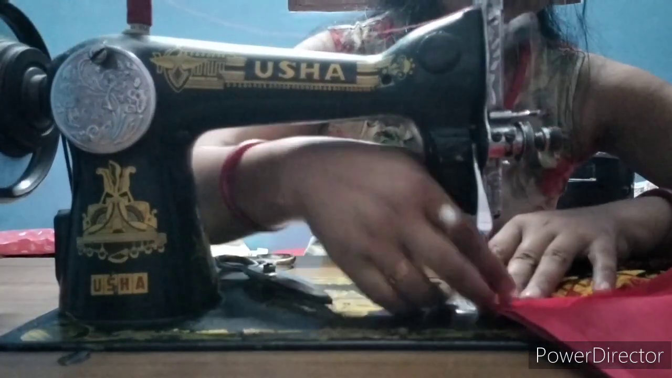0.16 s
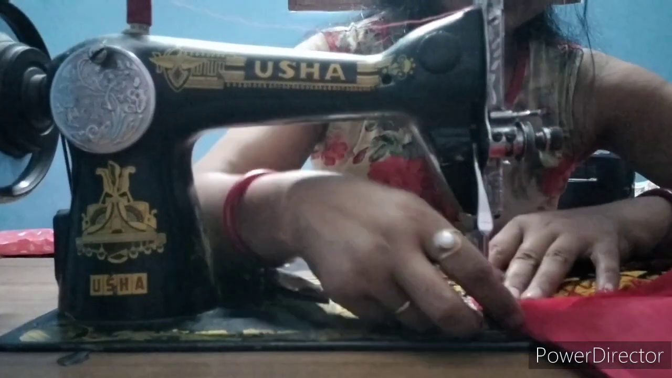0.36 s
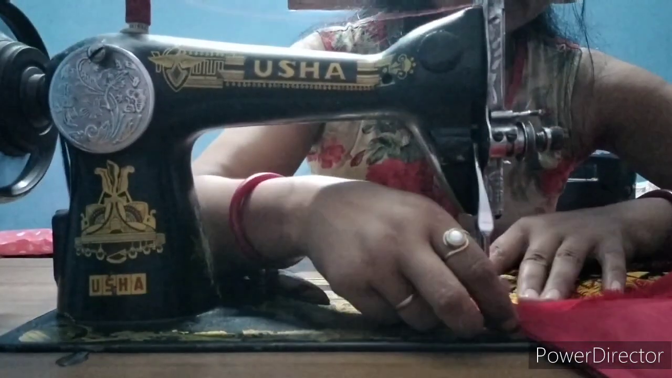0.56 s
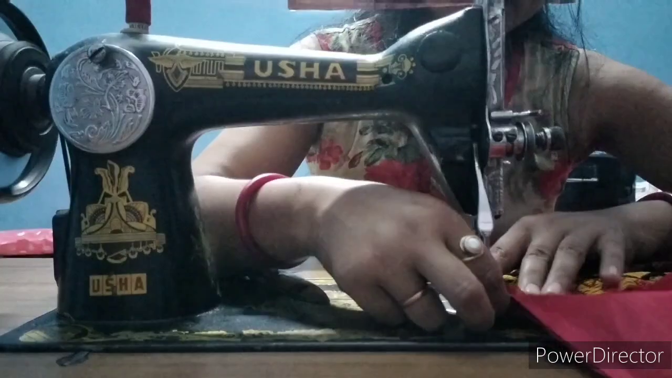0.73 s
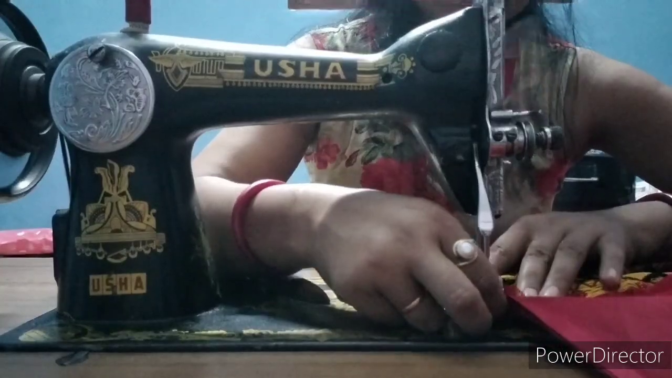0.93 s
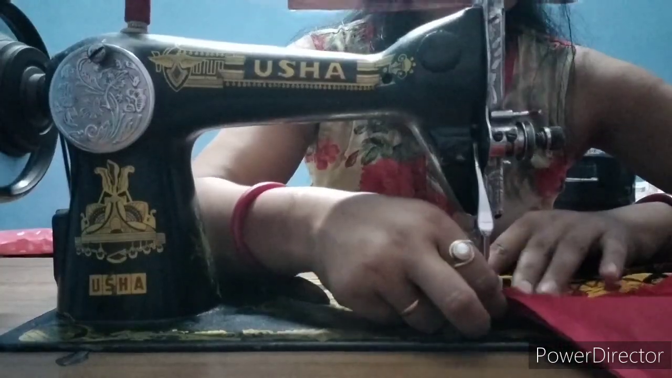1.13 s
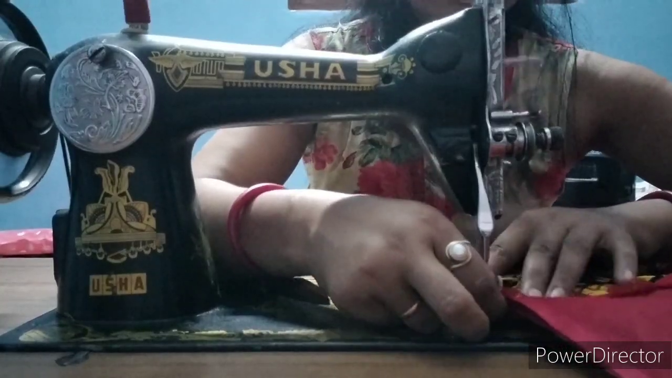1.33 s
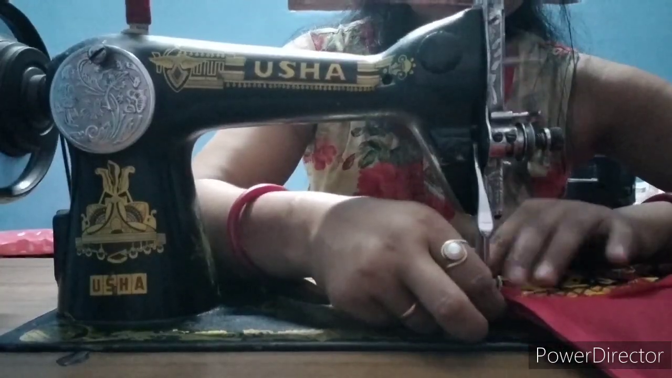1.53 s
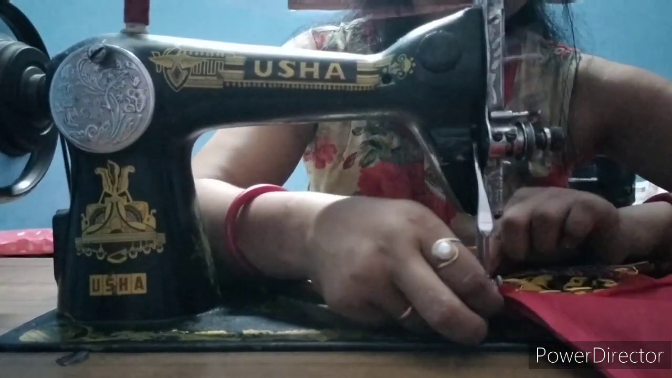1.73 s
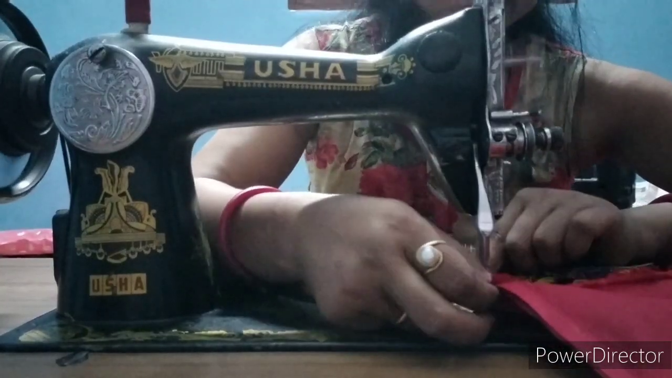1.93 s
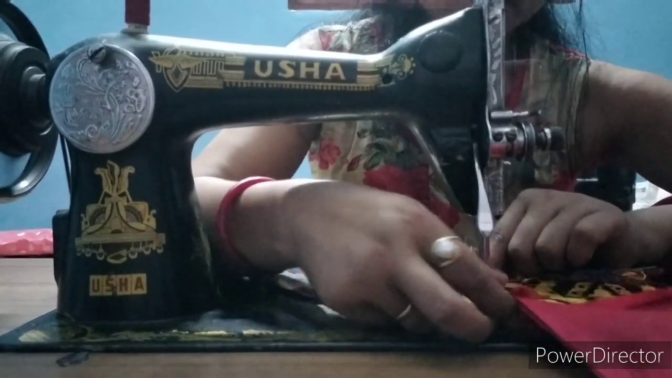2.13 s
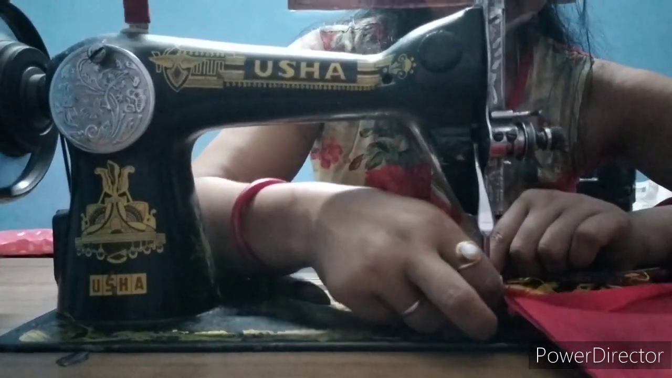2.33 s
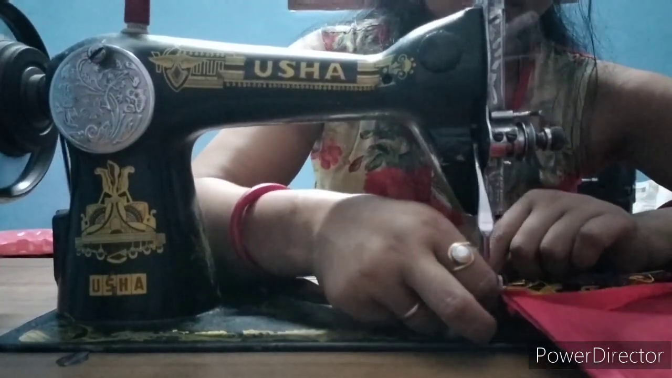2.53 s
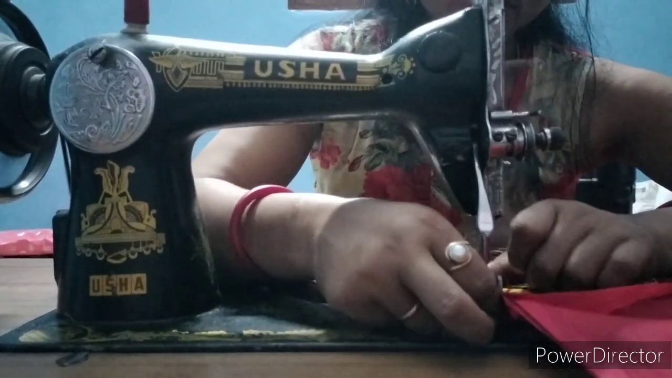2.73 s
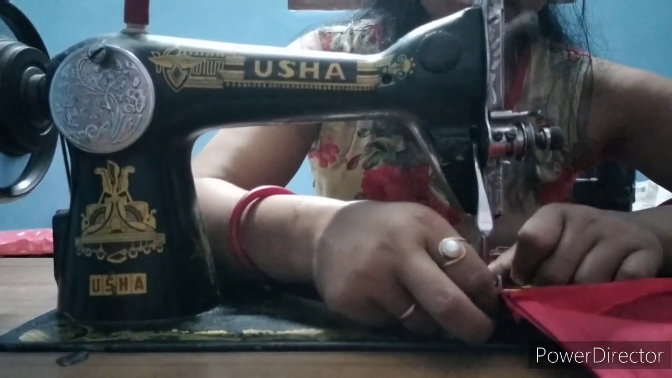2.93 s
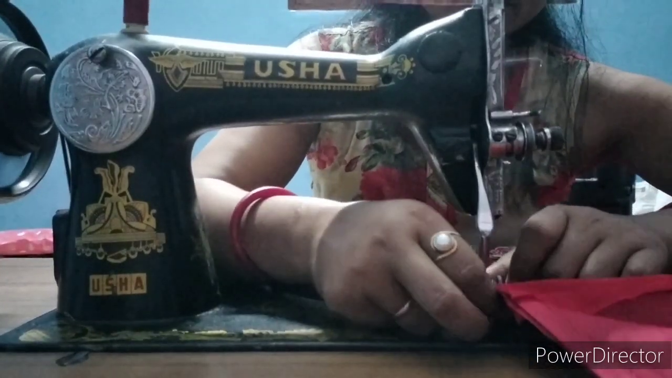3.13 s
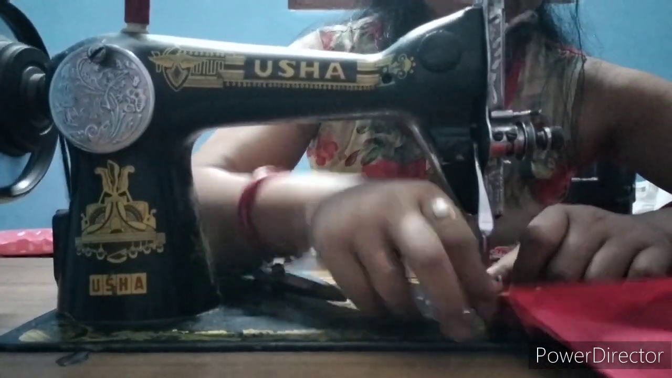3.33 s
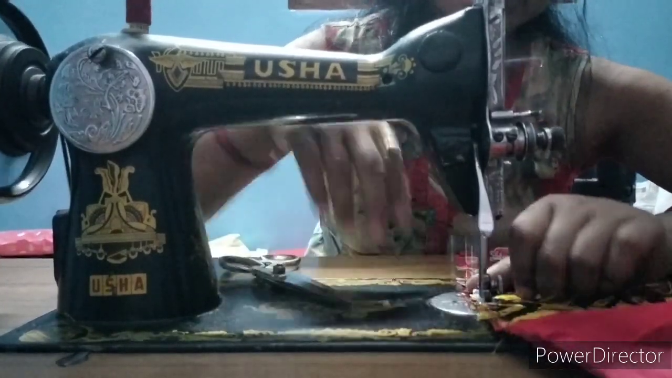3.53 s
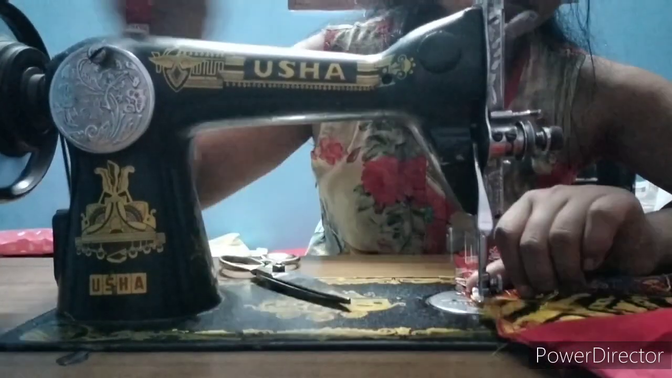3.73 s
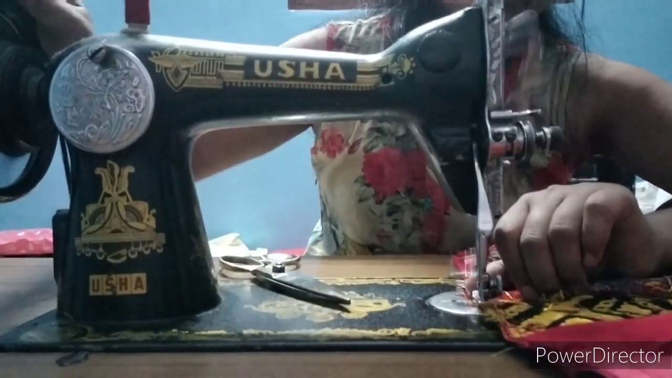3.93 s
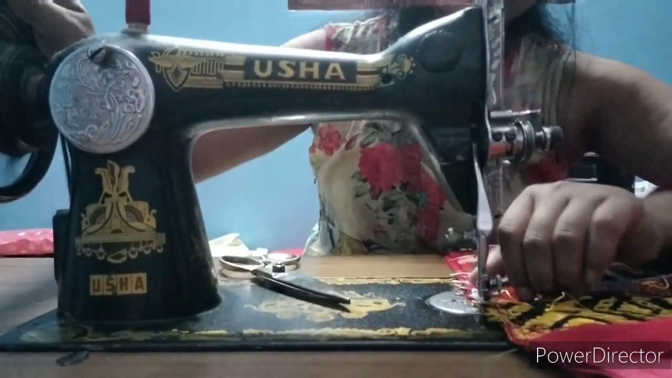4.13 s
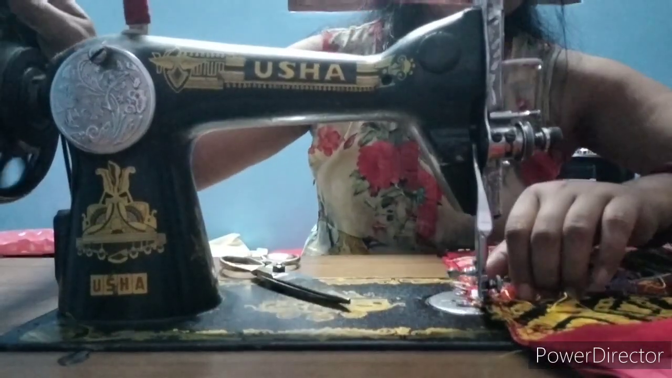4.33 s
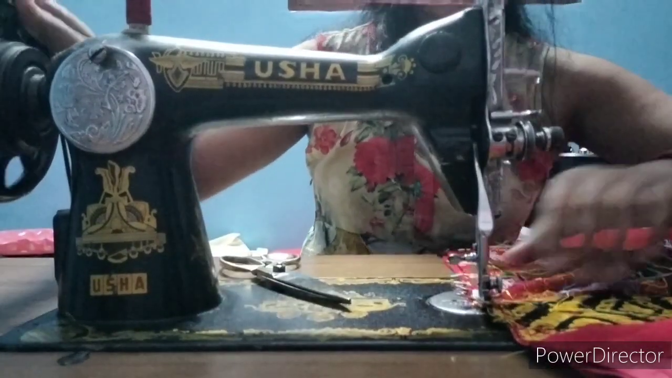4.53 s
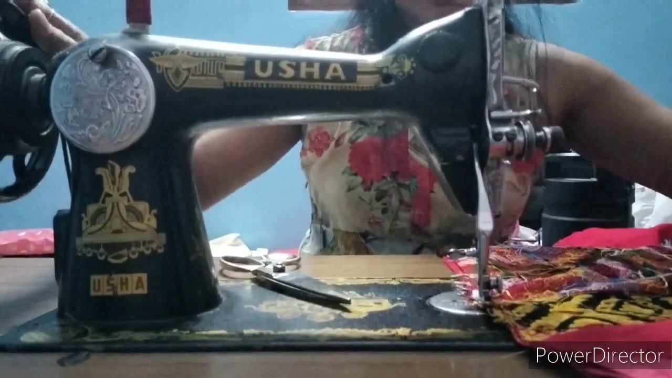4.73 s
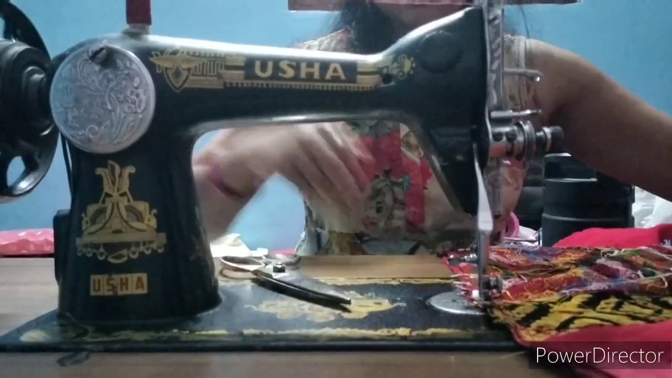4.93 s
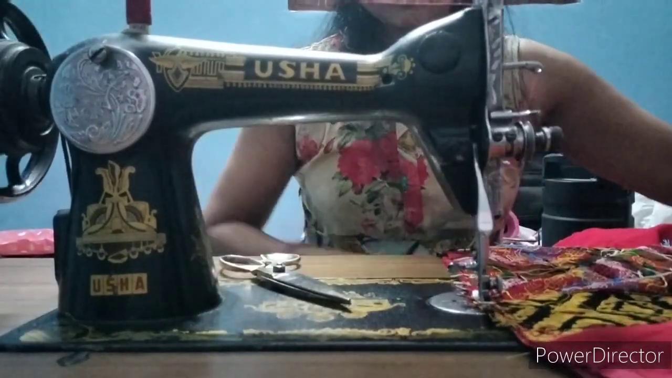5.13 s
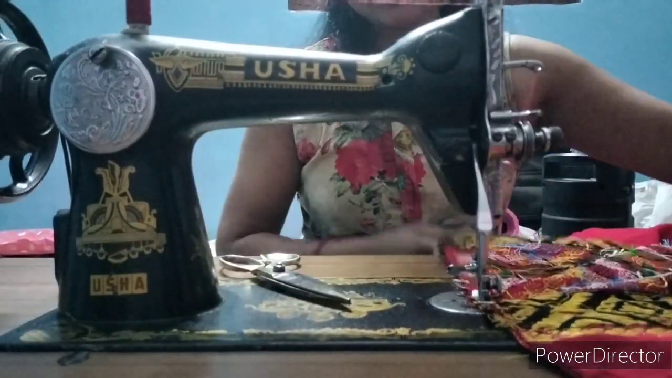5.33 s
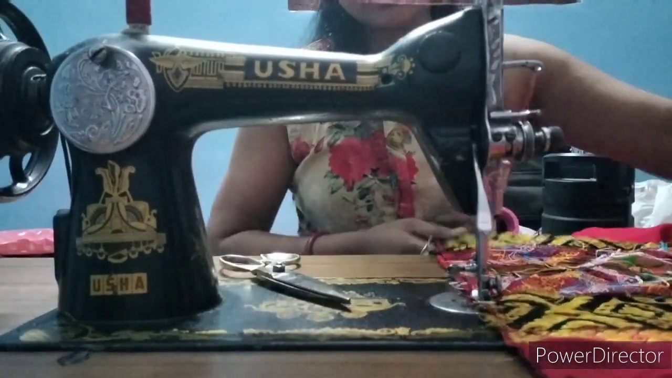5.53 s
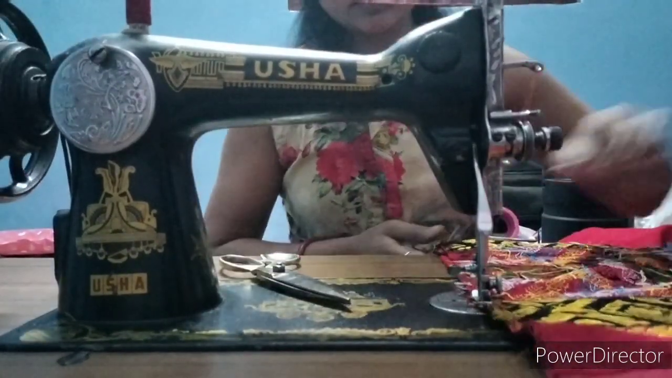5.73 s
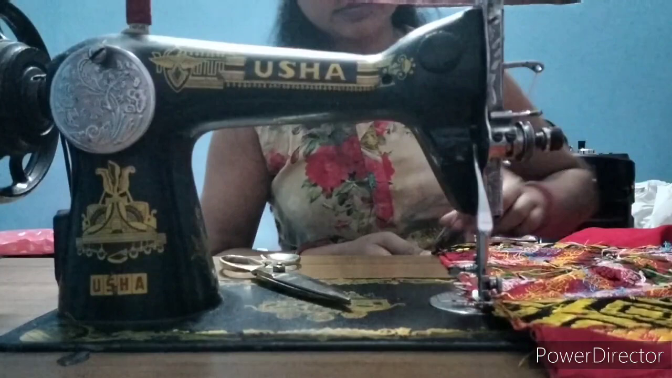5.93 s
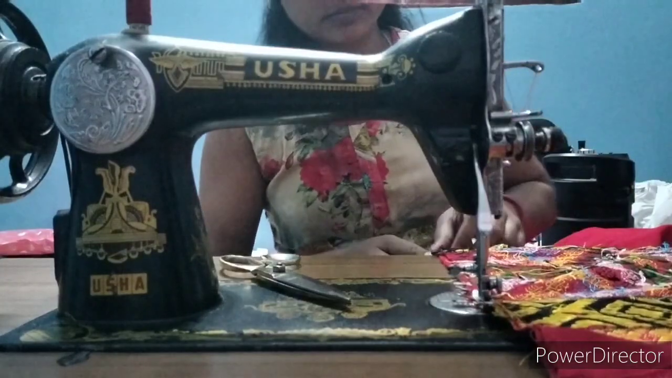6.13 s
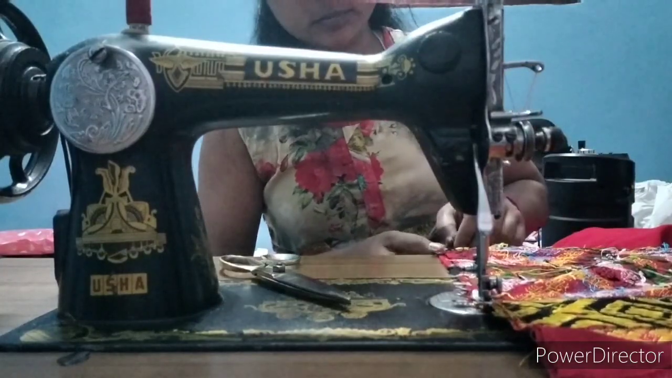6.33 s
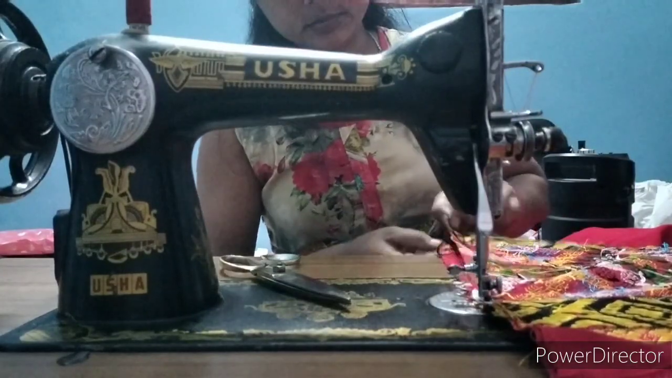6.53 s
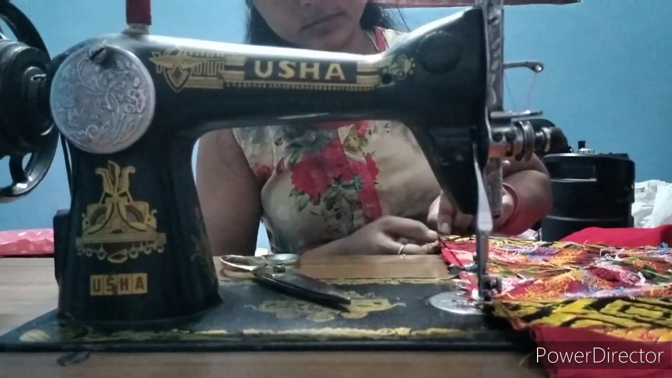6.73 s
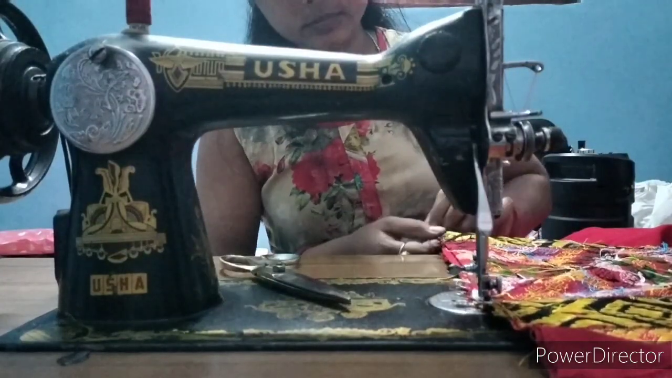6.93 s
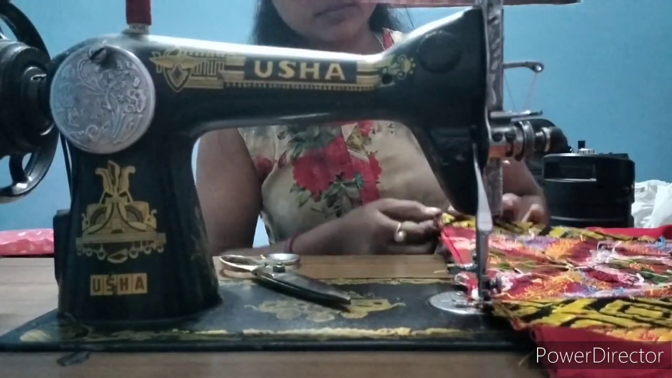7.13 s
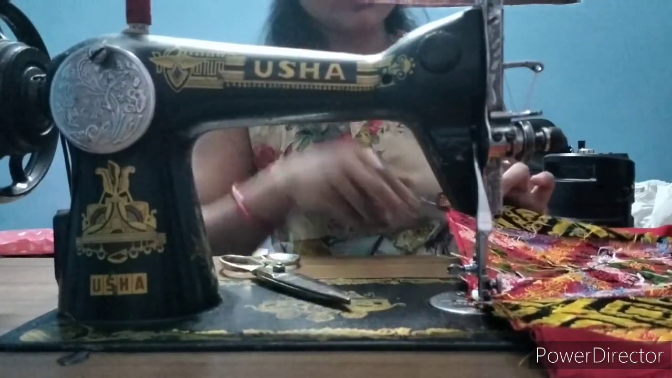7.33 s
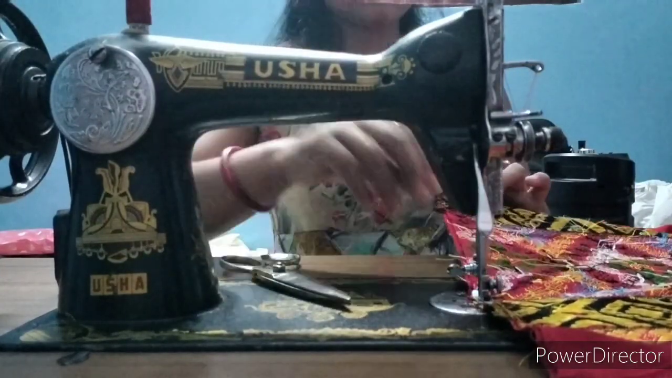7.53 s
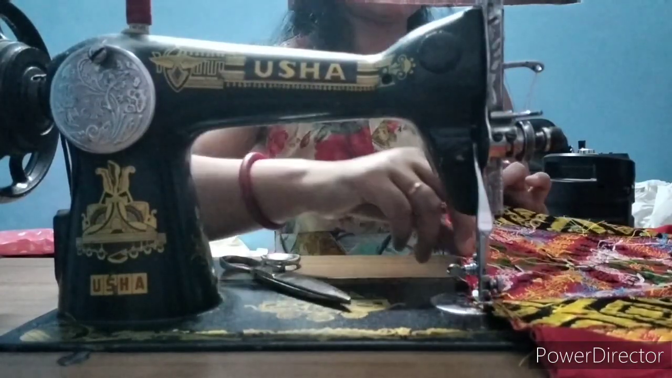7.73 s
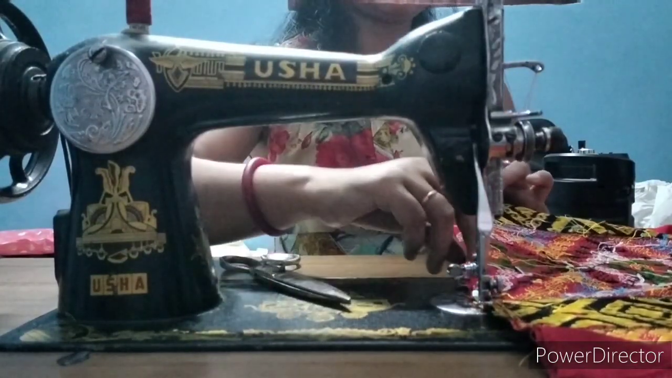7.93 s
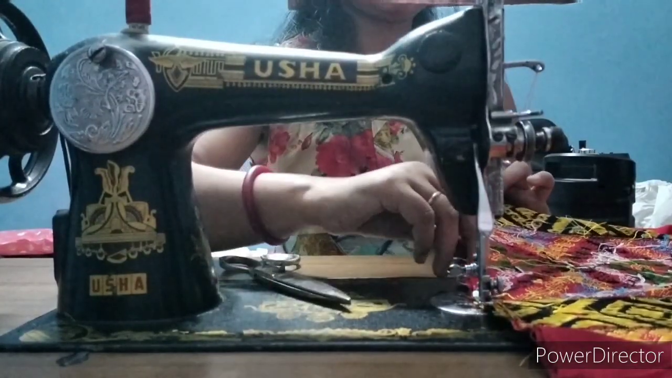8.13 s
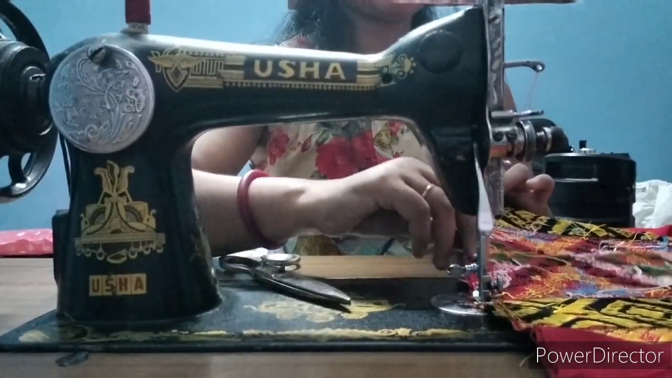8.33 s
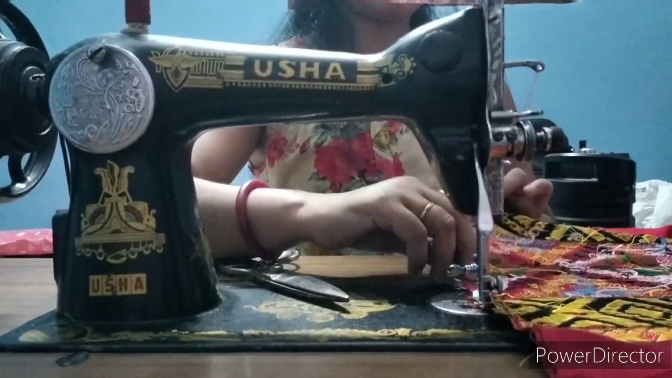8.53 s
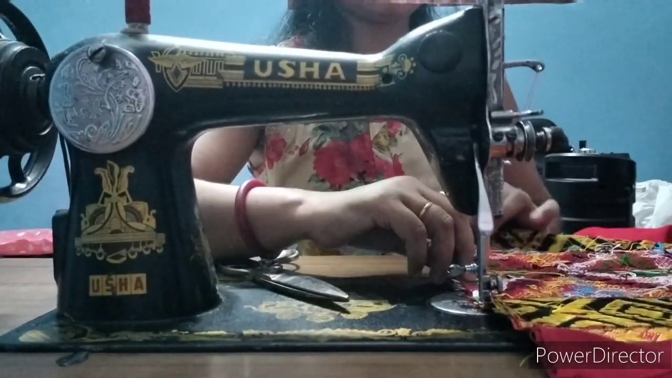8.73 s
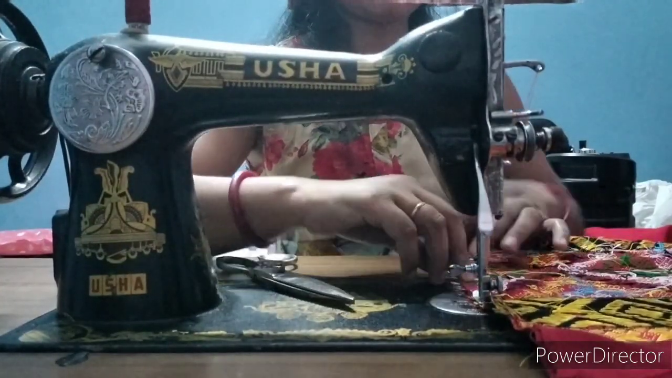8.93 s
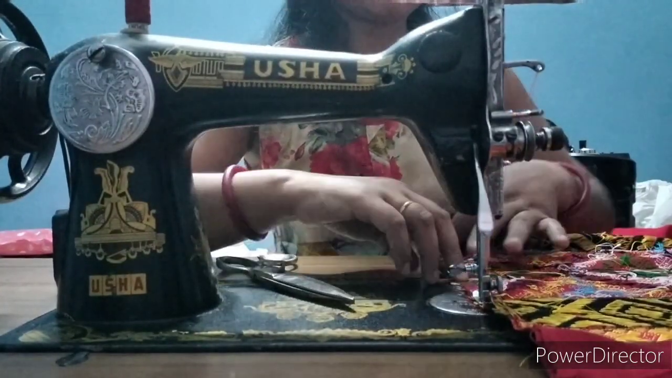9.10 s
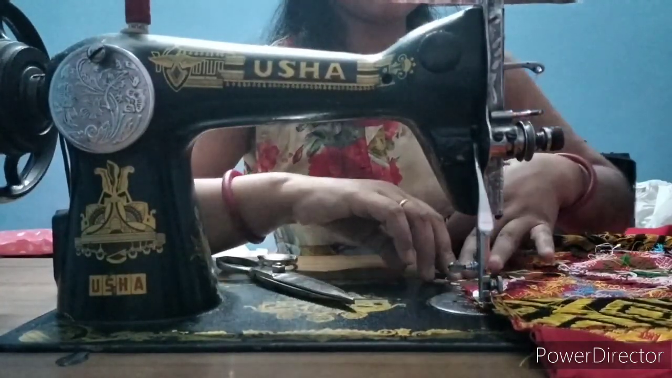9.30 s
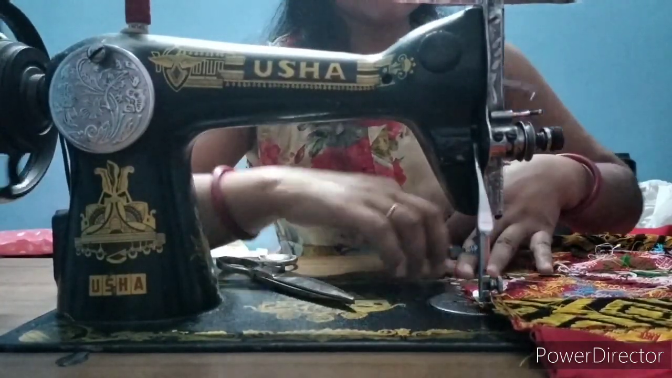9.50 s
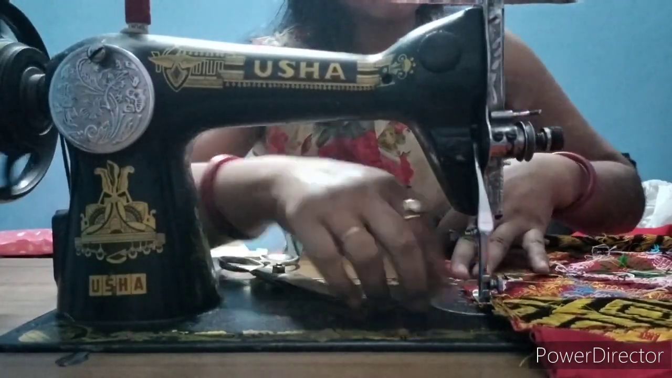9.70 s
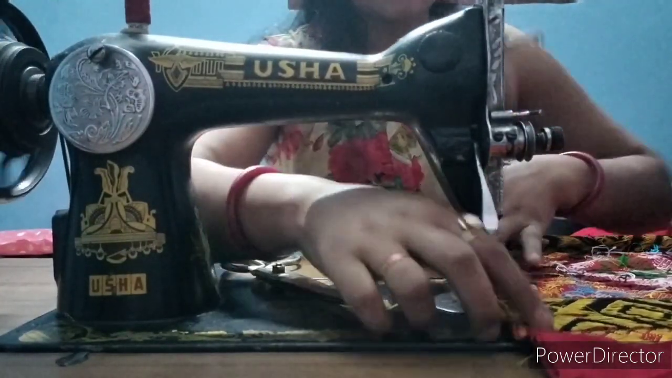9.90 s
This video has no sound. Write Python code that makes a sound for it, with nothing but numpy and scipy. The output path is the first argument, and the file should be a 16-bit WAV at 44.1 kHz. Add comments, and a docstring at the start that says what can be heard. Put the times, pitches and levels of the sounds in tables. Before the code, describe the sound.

A small room, closely miked in stereo, with a low steady fan hum around 143 Hz and soft low puffs of air mostly on the left. From 0 to 0.3 s a cluster of hard metallic clicks rings briefly. At about 0.4 s a cast-iron treadle sewing machine starts at six turns a second, each turn a tick, knock and snap, speeding to about twelve by 2.1 s. It runs evenly, clattering with rumble and loose rattle, until 3.6 s, then coasts down and stops near 4.2 s with faint clicks. From 4.6 to 5.5 s come quiet taps and a cloth slide at 5.15 s; then mostly hum, faint rustles and thin hisses. Small metal knocks fall at 8.3 and 8.7 s. From 9.4 s clicks become firmer and denser, ending in a swelling handwheel rush near 9.95 s.

```python
"""Small hard clicks over a fan's hum come first; then a treadle sewing machine speeds up, stitches evenly and
coasts to rest, and hands shift cloth and parts in a small room. Each shaft turn brings five contacts: noise
bursts that ring the modes of the cast-iron body. Shaped noise makes the rumble, the rattle and the cloth;
hand-moved parts ring modes of their own. The fan is a wavering tone, with puffs of noise mostly on the left."""
import sys
import numpy as np
from scipy import signal
from scipy.fft import rfft, irfft, next_fast_len
from scipy.io import wavfile
from scipy.ndimage import map_coordinates

SR = 44100
rng = np.random.default_rng(int(sys.argv[2]) if len(sys.argv) > 2 else 0)


def dump_mix(stems):
    """Bounce the given channels to the path in sys.argv[1] as a 16-bit WAV at rate SR."""
    frames = np.atleast_2d(stems).T  # one column per channel
    limited = np.clip(frames, -1, 1)  # hard clip at full scale
    pcm = np.round(limited * 32767).astype(np.int16)
    wavfile.write(sys.argv[1], SR, pcm)


N = 439236  # length in samples


def amp(db):
    """Gain of a level in dB."""
    return 10 ** (np.asarray(db) / 20)


def unit(x):
    """x scaled to an rms (average strength) of 1."""
    return x / np.sqrt(np.mean(x ** 2) + 1e-20)


def along(points, hz):
    """Reads a curve of (Hz, value) points on a log frequency axis."""
    point_hz, values = np.transpose(points)
    return np.interp(np.log(hz + 1), np.log(point_hz + 1), values)


def curve(rows):
    """One value per sample from (seconds, value) rows."""
    return np.interp(np.arange(N) / SR, *np.transpose(rows))


def wobble(rate):
    """A smooth random curve with rate random knots a second."""
    knots = rng.standard_normal(int(N * rate / SR) + 4)
    return map_coordinates(knots, [np.arange(N) * rate / SR])


def swells(rows, floor_db):
    """Gain of rounded swells (peak s, rise s, fall s, dB) added to a floor."""
    t = np.arange(N) / SR
    gain = amp(floor_db)
    for peak_s, rise, fall, db in rows:
        width = np.where(t < peak_s, rise, fall)
        gain = gain + amp(db) * np.exp(-2 * ((t - peak_s) / width) ** 2)
    return gain


def filtered(x, response):
    """x with each frequency multiplied by response(Hz)."""
    m = next_fast_len(x.shape[-1] + 4096)
    return irfft(rfft(x, m) * response(np.fft.rfftfreq(m, 1 / SR)), m)[..., :x.shape[-1]]


def bell(hz, centre_hz, octaves):
    """A rounded band on the log frequency axis."""
    return np.exp(-.5 * (np.log2((hz + 1) / centre_hz) / octaves) ** 2)


def add(track, s, sound):
    """Mixes a sound into the track at s seconds."""
    track[:, round(s * SR):][:, :sound.shape[1]] += sound


def mid_side_angle(alike, hz):
    """Mixing angle of two independent noises that gives the wanted left-right likeness."""
    return np.arccos(np.clip(along(alike, hz), -1, 1)) / 2


def rush(spectrum, alike, lumps=1):
    """Stereo noise of rms 1 with a given spectrum; lumps is a gain that both channels share."""
    def shape(hz):
        angle = mid_side_angle(alike, hz)
        return amp(along(spectrum, hz)) * [np.cos(angle), np.sin(angle)]
    mid, side = filtered(rng.standard_normal((2, N)) * lumps, shape)
    return unit(np.array([mid + side, mid - side]))


# A very faint steady noise band near 15 kHz. Each row: frequency in Hz, relative level in dB per Hz.
TOP_BAND = [(14500, -36), (14800, 0.5), (15100, 2), (15400, -47.5)]


def top_band():
    """Steady noise kept to a narrow band near 15 kHz."""
    return amp(-86.5) * rush(TOP_BAND, [(15000, .3)])


# Steady room noise. Each row: frequency in Hz, relative level in dB per Hz.
AIR = [(20, -5.5), (60, -20.5), (85, -9), (107, 5.5), (125, -11), (192, 0.5), (250, -4), (310, -16),
       (400, -7.5), (530, -18.5), (640, -12.5), (1200, -19), (2600, -29.5), (4000, -48.5), (13000, -67.5)]
# How alike left and right hear it. Each row: frequency in Hz, likeness (limited to -1..1).
AIR_ALIKE = [(60, 0.89), (180, 0.93), (550, 0.12), (1650, -0.02), (4970, -1.134), (15000, 0.33)]
# Puffs of air on the left port. Each row: peak time in seconds, width in seconds, level in dB.
GUSTS = [(.41, 0.018, -47.5), (1.11, 0.045, -61), (1.36, 0.045, -27), (1.69, 0.037, -41),
         (2.02, 0.044, -46), (2.49, 0.051, -46.5), (2.63, 0.32, -38), (2.74, 0.017, -29.5),
         (2.94, 0.029, -40), (3.16, 0.04, -32.5), (3.35, .04, -44.5), (3.65, .1, -58), (4.08, .03, -53),
         (5.15, 0.12, -35.5), (5.29, .04, -38), (5.55, 0.055, -53), (9.74, .04, -44)]
# The colour of the puffs. Each row: frequency in Hz, relative level in dB per Hz.
BUFFET = [(15, -16.5), (35, -1), (60, -5), (120, -7), (250, -43.5), (600, -120)]
HUM_HZ, HUM_DB, AIR_DB = 142.8, -40.5, -50
DRAUGHT_DB, RIGHT_PORT_DB = -60, -20  # level between the puffs; the sheltered right port relative to the left


def fan():
    """A hum that wavers in level and phase, room noise, and air buffeting mostly the left port."""
    t = np.arange(N) / SR
    hum = amp(HUM_DB + 1.6 * wobble(8)) * np.sin(2 * np.pi * HUM_HZ * t + 0.41 * wobble(4.4))
    hum = hum * amp([[-.4], [.4]])  # left, right dB
    air = amp(AIR_DB) * rush(AIR, AIR_ALIKE, amp(1.6 * wobble(7))) * amp([[-.6], [.6]])
    puffs = swells([(s, width, width, db) for s, width, db in GUSTS], DRAUGHT_DB)
    flutter = amp(0.87 * wobble(15) + 2.5 * wobble(4.3))
    gusts = puffs * rush(BUFFET, [(40, 0.18)], flutter) * amp([[0], [RIGHT_PORT_DB]])
    return hum + air + gusts


# Cloth sliding, one stroke a row; the last row is the rush as the handwheel begins to turn.
# Each row: peak time in seconds, rise in seconds, fall in seconds, level in dB.
RUSTLE = [(4.5, .15, .4, -85), (4.85, 0.15, 0.22, -76), (8.55, 0.14, .15, -90.5), (5.15, 0.1, 0.27, -61.5),
          (5.95, 0.16, 0.27, -69.5), (6.28, 0.14, 0.16, -73.5), (7.07, 0.57, 0.12, -80.5),
          (8.78, 0.35, 0.28, -86), (9.2, 0.12, 0.34, -82), (9.5, 0.044, 0.075, -54),
          (9.6, 0.18, 0.068, -49.5), (9.72, .12, 0.15, -60), (9.96, 0.11, .1, -35.5)]
# The colour of these strokes. Each row: frequency in Hz, relative level in dB per Hz.
CLOTH = [(1470, -15.5), (2500, -9), (2970, -12.5), (10900, -22), (14600, -23.5), (15600, -20.5),
         (16000, -47.5)]
# Short faint hisses, broad or narrow; the broad ones brighten the cloth strokes.
# Each row: start in seconds, length in seconds, share of it spent rising,
# centre in Hz, width in octaves, level in dB.
HISSES = [(5.09, .18, .5, 9000, .6, -61), (5.483, 0.21, 0.17, 7950, 1, -58.5),
          (8.64, .07, 0.28, 5250, .15, -78), (5.872, 0.34, 0.35, 5500, 0.22, -67.5),
          (6.439, 0.23, 0.091, 7470, 0.044, -69), (6.617, 0.12, 0.4, 5600, 0.23, -70.5),
          (6.71, 0.13, 0.25, 5280, 0.26, -69.5), (7.058, 0.063, 0.39, 7000, 0.57, -78),
          (7.447, 0.13, .03, 4800, 0.25, -66.5), (7.92, 0.11, 0.043, 4830, 0.29, -65),
          (8.923, 0.12, 0.027, 4800, 0.34, -67.5), (9.304, 0.1, 0.37, 5970, .06, -66)]
STILL_DB = -78.5  # cloth under resting hands


def rustle():
    """Sliding cloth, and at the end the handwheel's rush, is swelling noise; short bands of hiss come and go."""
    out = swells(RUSTLE, STILL_DB) * rush(CLOTH, [(1000, 0.1)], amp(1.3 * wobble(320)))
    t = np.arange(SR // 3) / SR
    for s, length, rise, hz, octaves, db in HISSES:
        noise = rng.standard_normal((2, len(t)))
        hiss = unit(filtered(noise, lambda f: bell(f, hz, octaves)))
        swell = np.interp(t, [0, rise * length, length], [0, 1, 0]) ** 1.6
        add(out, s, amp(db) * swell * hiss)
    return out


# Likeness of the machine noise and the echoes at the two sides. Each row: frequency in Hz, likeness.
ALIKE = [(60, .6), (180, .95), (550, .75), (1650, .25), (5000, .03), (15000, -.05)]
# How long the room rings. Each row: frequency in Hz, time in seconds to fall 60 dB.
ROOM = [(200, 0.56), (1000, 0.29), (4000, 0.19), (14000, 0.033)]


def room(x):
    """The walls answer with tails of fading noise, drawn anew every third of a second, most alike in the bass."""
    out, step = np.zeros((2, N + SR)), SR // 3
    for start in range(0, N, step):
        hz, t, z = signal.stft(rng.standard_normal((2, SR // 2)), SR, nperseg=256)
        angle = mid_side_angle(ALIKE, hz)[:, None]
        mid, side = z[0] * np.cos(angle), z[1] * np.sin(angle)
        fade = amp(-60 * t / along(ROOM, hz)[:, None])
        tail = signal.istft([mid + side, mid - side] * fade, SR, nperseg=256)[1]
        tail = tail / np.linalg.norm(tail[0])
        echo = signal.fftconvolve(x[:, start:start + step], tail, axes=1)
        add(out, start / SR + .006, echo)  # the echo sets in 6 ms late
    return out[:, :N]


# Small hard things knocked by the hands, one list of ringing tones (modes) for each thing.
# Each row: frequency in Hz, level in dB, time in seconds to fall 60 dB.
STEEL = [
    [(1140, -9, 0.087), (1640, -3, 0.14), (1730, -5, 0.14), (2090, 2, 0.1), (3840, -2, 0.036),
     (5200, -14, .05), (6810, -9, 0.088), (7870, -17, .08)],
    [(900, -5, 0.12), (1040, -6, 0.11), (1300, -12, 0.093), (1662, -5, 0.13), (2260, 1.5, 0.044),
     (2590, 0, 0.04), (3390, -16, 0.17), (4050, -2, 0.023), (4320, -6, 0.03), (5820, -29, .04)],
    [(645, -1, 0.047), (2220, 0, 0.046), (2370, -4, 0.041), (5710, 3, .025), (8150, -2, .03),
     (10660, -6, 0.077), (13200, -4, 0.14)],
    [(1330, -4.5, 0.032), (2160, -4, .05), (2613, 1.5, 0.027), (3800, -5, .02)],
    [(432, -0.5, 0.16), (696, -4, .04), (1250, -9, .03), (1710, -7, .04), (2490, 1, .02)],
]
# The knocks each thing gets, in the same order. Each row: time in seconds, level in dB.
STEEL_KNOCKS = [
    [(4.154, -49), (8.325, -42.5)],
    [(8.7095, -32.5), (8.7728, -48)],
    [(9.5106, -44), (9.5154, -29), (9.6, -47), (9.615, -44), (9.63, -53)],
    [(.1382, -32), (.145, -20.5), (.1765, -22.5), (.187, -24.5), (.2147, -25), (5.029, -56), (9.876, -37),
     (9.94, -28.5)],
    [(4.0715, -48), (4.155, -51), (4.9153, -53), (5.0674, -43)],
]
STEEL_ROUGH = .055  # random walk of the ringing phase (radians per sample)


def steel():
    """Each knock rings all modes of its object, a little unsteadily and out of step at the two microphones."""
    out, t = np.zeros((2, N + SR)), np.arange(SR // 4) / SR
    for modes, knocks in zip(STEEL, STEEL_KNOCKS):
        hz, mode_db, t60 = np.transpose(modes)[:, :, None]
        for s, db in knocks:
            start, lag = rng.standard_normal((2, len(modes), 1))
            drift = STEEL_ROUGH * np.cumsum(rng.standard_normal((len(modes), len(t))), axis=1)
            phase = 2 * np.pi * hz * t + start + drift
            size = amp(db + mode_db - 60 * t / t60) * (1 - np.exp(-t / 0.00054))
            sides = [np.sum(size * np.sin(phase + side * lag * hz / 5000), 0) for side in (-1, 1)]
            add(out, s, np.array(sides))
    return out[:, :N]


# The ringing tones (modes) of the iron body and its table.
# Each row: frequency in Hz, level in dB, time in seconds to fall 60 dB, rise in seconds.
BODY = [(343.6, 3, 0.16, 0.0069), (411, 1, 0.072, 0.0034), (466, -5.5, 0.079, 0.0063),
        (517, -13, 0.047, 0.008), (632.3, -7, 0.14, 0.0014), (826, -15, 0.043, 0.0025),
        (934, 4.5, .047, .0045), (975, -12, 0.035, 0.005), (1024, -7.5, 0.021, .004),
        (1350, -4.5, 0.024, 0.003), (1463, -3.5, 0.033, 0.0057), (1140, -10.5, 0.016, 0.0027),
        (1258, -6.5, 0.043, 0.002), (1360, -6, 0.031, 0.0023), (1756, -7.5, 0.035, 0.00059),
        (2195, -3.5, 0.036, 0.0018), (2437, 0.5, 0.036, 0.0025), (2730, -3.5, 0.046, 0.00025),
        (3176, -3.5, 0.054, 0.0012), (4220, -5, 0.053, .0005), (4565, 1.5, 0.04, 0.00032),
        (5025, -1.5, 0.025, 0.00033), (5144, -1.5, 0.061, 0.00038), (6440, 8.5, 0.0077, 0.00032),
        (7740, 3.5, 0.025, 0.00021), (13300, -11.5, 0.055, .0005)]


def blow(ring_hz, ring_octaves, ring_db, crack_hz, crack_octaves, crack_db, rise, t60, scatter_db, held_t60=1):
    """One contact in stereo: a lumpy noise burst (crack) and the body modes near ring_hz, damped by held_t60."""
    t = np.arange(SR // 12) / SR
    noise = rng.standard_normal((3, len(t)))
    # the parts chatter against each other, so the burst comes in lumps about a millisecond long
    lumps = amp(1.5 * np.interp(t * 900, np.arange(100), rng.standard_normal(100)))
    burst = (noise[1:] + 0.087 * noise[0]) * lumps  # a little noise is shared by both sides
    crack = unit(filtered(burst, lambda hz: bell(hz, crack_hz, crack_octaves)))
    crack = crack * amp(crack_db - 60 * t / t60) * (1 - np.exp(-(t / rise) ** 2))

    near = bell(np.array(BODY)[:, 0], ring_hz, ring_octaves) > .02
    hz, db, ring_t60, ring_rise = np.transpose(BODY)[:, near, None]
    chance = rng.standard_normal((len(BODY), 4))[near]
    # the strongest mode answers alike each time, the others depend more on where the blow lands
    spread = np.minimum(.2 + 1.2 * np.abs(np.log2(hz / 930)), .9)
    size = amp(db + ring_db + scatter_db * spread * chance[:, :1]) * bell(hz, ring_hz, ring_octaves)
    # a hand on the part adds the damping held_t60
    swell = amp(-60 * t / ring_t60 - 60 * t / held_t60) * (1 - np.exp(-(t / ring_rise) ** 2))
    # high modes radiate from scattered spots and reach the two microphones out of step
    lag = chance[:, 1:2] * hz / 2400
    detune = 1 + 0.0063 * spread * chance[:, 2:3]
    phase = 2 * np.pi * hz * detune * t + 4 * chance[:, 3:]
    return crack + [np.sum(size * swell * np.sin(phase + side * lag), 0) for side in (-1, 1)]


# Single clicks of slowly turned parts, fingers and tools. Each row: time in seconds, level in dB, clack in Hz,
# thump in dB, brightness in dB, time in seconds for the burst to fall 60 dB.
CLICKS = [(0.0308, -25.5, 2900, -10.5, -27, 0.038), (0.0844, -26.5, 2360, -11, -22, 0.023),
          (0.1382, -25, 2560, -6, -43, 0.083), (0.145, -17.5, 2250, -13, -36, 0.027),
          (.1765, -25, 2580, -6.5, -29, 0.061), (0.1946, -20.5, 2120, -5, -23.5, 0.025),
          (0.2107, -22, 2500, -18, -19, .02), (0.2147, -22.5, 2510, -4.5, -20, 0.047),
          (0.3161, -20.5, 1720, -8.5, -29.5, 0.038), (4.019, -47, 1880, -13, -4.5, 0.033),
          (4.0715, -36.5, 2050, -14, -26, .048), (4.146, -46.5, 1690, -9, -23, 0.1),
          (4.6029, -55, 2500, -4, -23, 0.03), (4.652, -61, 1500, -6, -14, 0.036),
          (4.7316, -44, 2060, -6, -39, 0.022), (4.776, -43.5, 2060, -21, -39, 0.036),
          (4.8037, -55, 1700, -3, -21, 0.032), (4.8977, -50, 2030, -14, -33, 0.058),
          (4.9153, -45, 2150, 0, -33, 0.042), (5.0287, -44, 2510, -14, -29, 0.02),
          (5.0674, -45, 2510, -10, -24, 0.016), (5.454, -56, 1540, -9, -19.5, 0.039),
          (5.5386, -54, 1620, -13, -16, 0.044), (6.2334, -52, 1700, -4, -17, 0.047),
          (6.239, -45, 1760, -16, -24.5, 0.2), (8.325, -40, 1990, 0.5, -31, 0.036),
          (8.7098, -30, 2290, -6, -56, 0.031), (8.7725, -38, 2020, -1, -49, 0.056),
          (9.105, -51, 1530, 2, -34, 0.042), (9.1837, -53, 2030, 3.5, -34, 0.1),
          (9.436, -52, 2050, 1, -14, .035), (9.4512, -42.5, 2280, -2, -20, 0.07),
          (9.469, -46, 2260, -18, -10.5, 0.027), (9.5093, -32.5, 2410, -14, -20, 0.031),
          (9.5154, -33.5, 2210, -4.5, -16, 0.037), (9.598, -37, 2290, -5, -30, 0.044),
          (9.6098, -35.5, 2290, -13, -21, 0.035), (9.6834, -28.5, 2360, -5.5, -23, 0.015),
          (9.7718, -45, 1870, -1, -25, 0.14), (9.803, -30.5, 2160, -4, -16.5, 0.024),
          (9.859, -45, 1630, -2, -11, 0.042), (9.8727, -28.5, 1900, -7.5, -20.5, 0.059),
          (9.933, -28.5, 2580, -12, -15.5, 0.034), (9.939, -24.5, 2400, -6, -20, 0.033)]
# What thump, tick and sheen excite. Each row: centre in Hz, width in octaves, ring in dB, crack in dB.
CLICK_PARTS = [(756, 0.89, -1, 3), (5090, 0.56, -1, 18), (11230, 1, 4.5, 11.5)]
CLICK_RISE_S, SHEEN_DB, CLICK_PAN_DB = 0.0012, 4, 2.5  # rise; sheen over the tick; scatter of left-right


def clicks():
    """A clack in the middle, a thump of the table below, a tick and a sheen of small steel parts above."""
    out = np.zeros((2, N + SR))
    for s, db, clack_hz, thump_db, bright_db, t60 in CLICKS:
        sound = blow(clack_hz, 0.12, -1, clack_hz, 0.6, -3.5, CLICK_RISE_S, t60,
                     scatter_db=1.5, held_t60=1.2 * t60)
        part_levels = (thump_db, bright_db, bright_db + SHEEN_DB)
        for part_db, (hz, octaves, ring_db, crack_db) in zip(part_levels, CLICK_PARTS):
            part = blow(hz, octaves, ring_db, hz, octaves, crack_db, CLICK_RISE_S, t60,
                        scatter_db=0.0, held_t60=3 * t60)
            sound += amp(part_db) * part
        pan_db = np.array([[.5], [-.5]]) * CLICK_PAN_DB * rng.standard_normal()
        add(out, s - CLICK_RISE_S / 2, amp(db + pan_db) * sound)
    return out[:, :N]


# Shaft speed from the first tick on. Each row: time in seconds, speed in turns per second.
SPEED = [(.385, 5.913), (.544, 6.953), (.983, 8.17), (1.342, 9.793), (1.663, 10.466), (2.084, 11.705),
         (2.16, 11.262), (2.305, 11.893), (2.936, 12.405), (3.499, 12.505), (3.678, 11.222), (3.874, 7.018),
         (4.2, 3.75)]


def turns_made():
    """Shaft angle in turns at each sample: the speed added up over time."""
    t = np.arange(N) / SR
    moving = t >= SPEED[0][0]
    return np.cumsum(curve(SPEED) * moving) / SR + t * 1e-9  # the tiny slope keeps the angle rising


# How hard the machine shakes. Each row: time in seconds, level in dB relative to full running.
SHAKE = [(0, -12.5), (.2, -21), (.45, -7), (.56, -5.5), (.92, -5.5), (1.33, -3), (2.9, -3.5), (3.63, -2.7),
         (3.85, -5.5), (3.92, -9), (4.14, -21.5), (4.2, -32.5), (4.4, -48)]
# The colour of the rumble. Each row: frequency in Hz, relative level in dB per Hz.
RUMBLE = [(88, -29.5), (150, -6), (252, -18.5), (470, -8.5), (616, -7), (744, -9.5), (930, -14.5),
          (1120, -14.5), (1310, -8), (1600, -20), (2500, -16.5), (3250, -55), (5500, -120)]
# The colour of the rattle. Each row: frequency in Hz, relative level in dB per Hz.
RATTLE = [(710, -30), (1200, -9), (1630, -15), (2730, -12.5), (3700, -13), (5020, -12.5), (10600, -20),
          (13000, -17.5), (15200, -24), (16000, -39)]
FULL_SPEED = 12  # turns per second
RUMBLE_DB, RATTLE_DB = -26, -25.5  # at full running
RATTLE_GROWS, RATTLE_DB_PER_OCTAVE = 0.71, 8  # rattle dB per dB of shake, and per octave of speed
PULSE_DB, QUIET_ANGLE = 1.5, -0.13  # the noise dips once a turn, just before the tick (turns)


def running():
    """Shafts and belt rumble through the low body modes; loose linkages rattle in tiny uneven ticks."""
    shake_db = curve(SHAKE + [(SHAKE[-1][0] + .1, -90)])  # fades out after the last row
    rumble = amp(RUMBLE_DB + shake_db)
    speed_db = RATTLE_DB_PER_OCTAVE * np.log2(curve(SPEED) / FULL_SPEED)
    rattle = amp(RATTLE_DB + RATTLE_GROWS * shake_db + speed_db)
    ticks = (rng.random(N) < 500 / SR) * amp(1.5 * rng.standard_normal(N))  # about 500 a second
    grain = 2.0 + unit(signal.lfilter([1], [1, -.97], ticks))

    def low_modes(f):
        return 1.6 + sum(bell(f, mode[0], 0.045) for mode in BODY if mode[0] < 700)
    drone = unit(filtered(rush(RUMBLE, ALIKE, amp(1.5 * wobble(70))), low_modes))
    pulse = amp(-PULSE_DB * np.cos(2 * np.pi * (turns_made() - QUIET_ANGLE)))
    return pulse * (rumble * drone + rattle * rush(RATTLE, ALIKE, grain))


# The voices of tick, knock, click, snap and return; the knock's ring shifts with speed, see below.
# Each row: ring centre in Hz, ring width in octaves, ring in dB, crack centre in Hz, crack width in octaves,
# crack in dB, crack rise in seconds, time in seconds for the crack to fall 60 dB.
CONTACTS = [(5500, .6, -12, 7400, .8, 0, .0016, .024), (1000, .4, 0, 2800, 1, -5, .004, .035),
            (6000, .6, -12, 8000, .9, -1, .002, .03), (5000, .8, -13, 7500, 1.25, 2, .0024, .025),
            (1900, .6, -7, 2100, .6, -3, .003, .05)]
# When these five fall in a turn. Each row: shaft angle in turns, slack in seconds, lag in turns when coasting.
CAMS = [(0, -.0008, 0), (.14, -.0027, 0), (.13, 0, .01), (.222, .0026, .03), (.67, -.0075, 0)]
# How strong these five are. Each row: dB at full speed, dB per octave of speed, dB per dB of shake,
# dB added when coasting, random scatter in dB.
STRENGTHS = [(-14, 7.5, .05, -3, 1.5), (-5, 1, .85, -4, .5), (-20, 0, .25, -3, 1.5),
             (-11.5, 1.5, .36, -2, 1.3), (-12.5, 0, .75, -7, 1.2)]
# Lighter contacts whose strength follows the tick.
# Each row: angle in turns, centre in Hz, width in octaves, level in dB relative to the tick.
CHATTER = [(0.33, 2700, 1, -16), (.33, 400, 0.98, -11), (0.92, 3000, 0.79, -17), (.79, 470, 0.52, -12.5),
           (.45, 500, 0.22, -6), (.088, 2800, 0.5, -2), (.115, 2440, .2, 1.5), (.27, 930, .1, -3.5),
           (0.65, 6100, .6, -7), (.245, 1400, 0.23, 2.5), (0.28, 3400, 0.35, -2), (.61, 930, 0.14, 1.5),
           (0.69, 1600, .2, 0), (0.56, 1250, 0.15, -10)]
TURNS, COAST_S = 37.5, 3.58  # turns made; when the foot stops pushing (s)
SLOW_SHARPENS = .48  # octaves the knock's ring centre rises per octave of speed below full
# slower than FIRM_SPEED (turns per s) or coasting, the knock and the chatter ring the body less
FIRM_SPEED, LOOSE_DB_PER_OCTAVE, LOOSE_COAST_DB = 7, 30, -3


def stitches():
    """Each turn of the shaft plays the contacts at their cam angles, shifted by the slack of the links."""
    out, t = np.zeros((2, N + SR)), np.arange(N) / SR
    speed, shake_db, turned = curve(SPEED), curve(SHAKE), turns_made()
    full_db, per_octave, per_shake, coast_db, scatter_db = np.transpose(STRENGTHS)
    for turn in np.arange(TURNS):
        k = np.searchsorted(turned, turn + 1e-6)  # the sample where this turn begins
        coasting = t[k] > COAST_S
        levels = full_db + per_octave * np.log2(speed[k] / FULL_SPEED) + per_shake * shake_db[k]
        levels = levels + coast_db * coasting + scatter_db * rng.standard_normal(len(STRENGTHS))
        loose_db = LOOSE_DB_PER_OCTAVE * min(0, np.log2(speed[k] / FIRM_SPEED)) + LOOSE_COAST_DB * coasting
        voices = np.array(CONTACTS)
        voices[1, 2] += loose_db  # row 1 is the knock
        voices[1, 0] *= (speed[k] / FULL_SPEED) ** -SLOW_SHARPENS
        for db, (angle, slack, lag), voice in zip(levels, CAMS, voices):
            if turn + angle < TURNS:
                s = max(t[k], np.interp(turn + angle + lag * coasting, turned, t)) + slack
                add(out, s, amp(db) * blow(*voice, scatter_db=2.5))
        for angle, hz, octaves, db in CHATTER:
            shift, loud = rng.standard_normal(2)
            if turn + angle < TURNS:
                sound = blow(hz, octaves, -8.5 + loose_db, hz, octaves, -2.5, 0.0018, 0.014, scatter_db=2.0)
                s = np.interp(turn + angle + .008 * shift, turned, t)
                add(out, s, amp(levels[0] + db + 1.8 * loud) * sound)
    return out[:, :N]


# Left-right balance of the machine and the knocked parts.
# Each row: frequency in Hz, left over right in dB.
BALANCE_DB = [(60, 0.5), (240, -0.5), (950, 0), (3770, 0), (15000, -2)]


def scene():
    """Machine, hands and fan in the room, with the faint top band."""
    turning, handled, knocked = stitches(), clicks(), steel()
    # the hands' sounds send more into the room than the stitching
    echoes = amp(-13.5) * room(turning + amp(9) * handled + amp(4) * knocked)
    machine = turning + handled + knocked + echoes + running()
    balanced = filtered(machine, lambda hz: amp(along(BALANCE_DB, hz) * [[.5], [-.5]]))
    return balanced + rustle() + fan() + top_band()


TOP_HZ = 16600  # the sound ends here


def record(dry):
    """A soft limit rounds off the tallest peaks; the sound dulls steeply above 15 kHz and ends at 16.6 kHz."""
    rounded = dry / (1 + np.abs(dry / .95) ** 6) ** (1 / 6)
    dulling = [(13500, 2.0), (15300, 1.0), (15800, -24.5), (16600, -41.5)]  # Hz, dB
    return filtered(rounded, lambda hz: amp(along(dulling, hz)) * (hz < TOP_HZ))


dry = scene()
out = record(dry)
dump_mix(out)
```